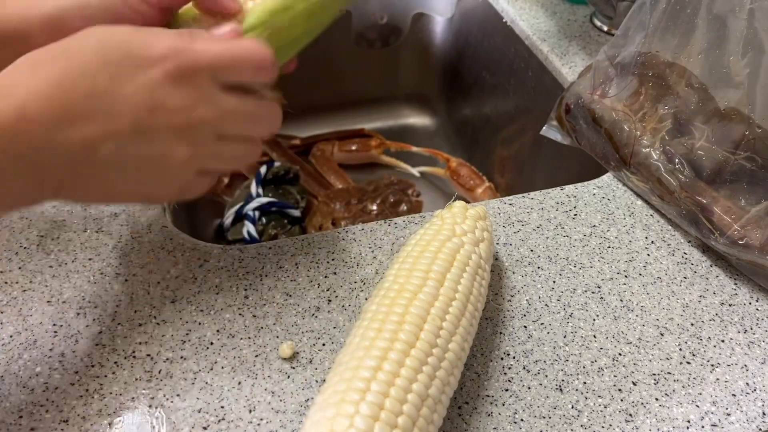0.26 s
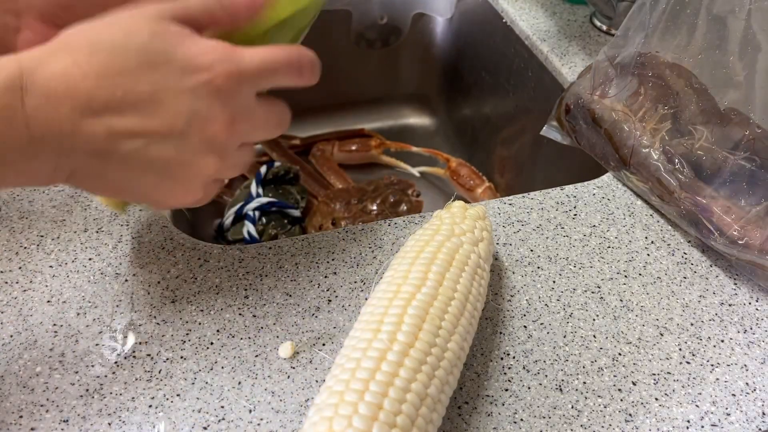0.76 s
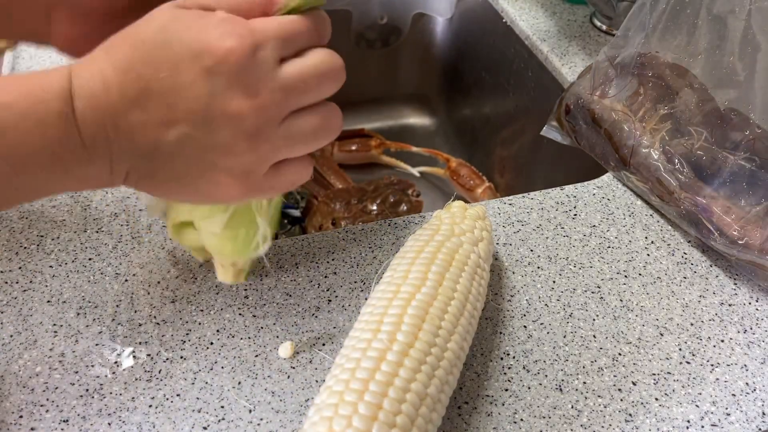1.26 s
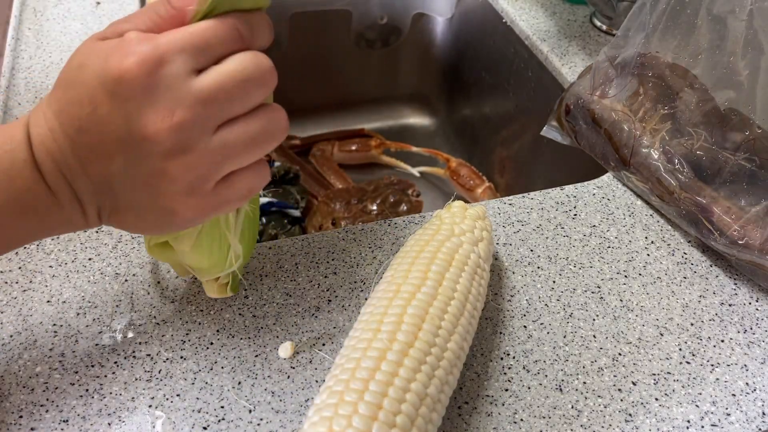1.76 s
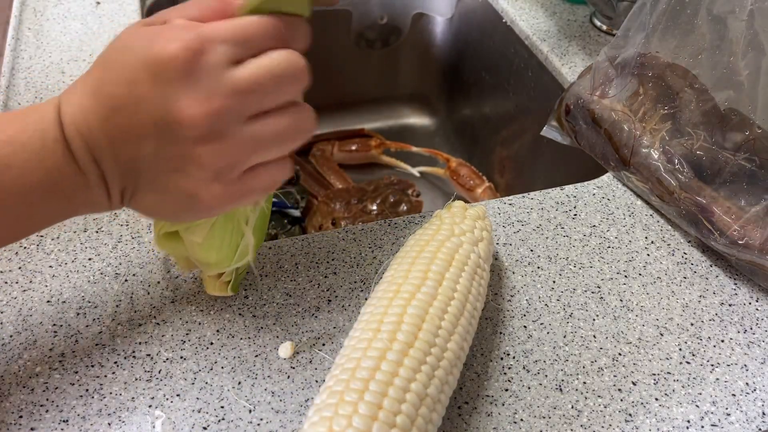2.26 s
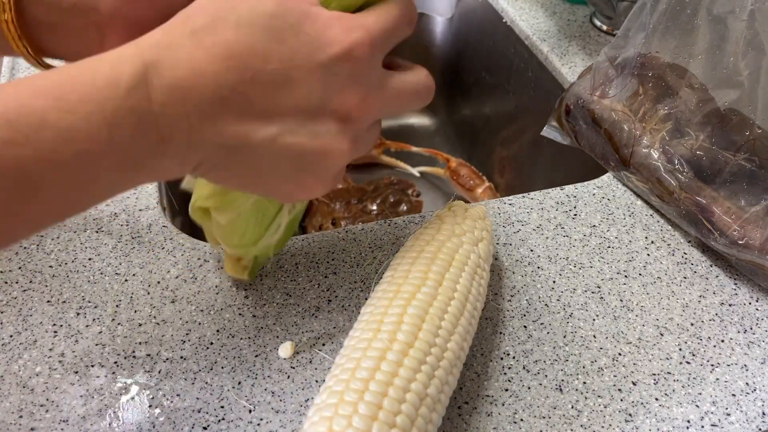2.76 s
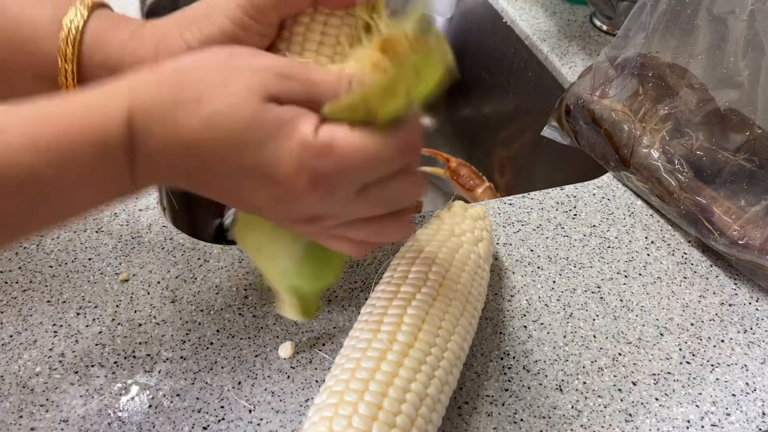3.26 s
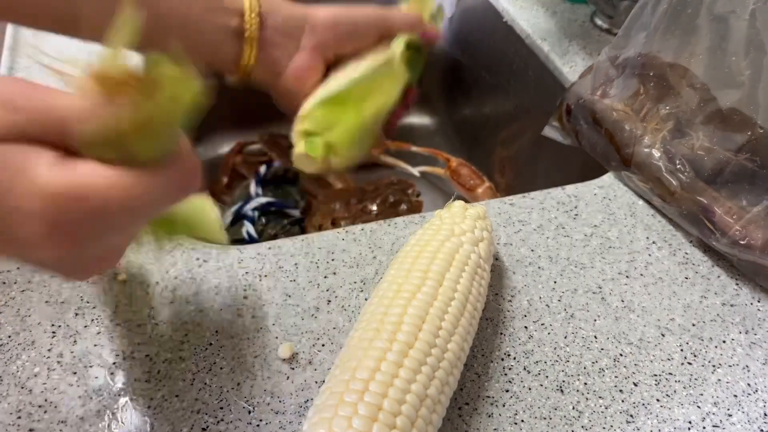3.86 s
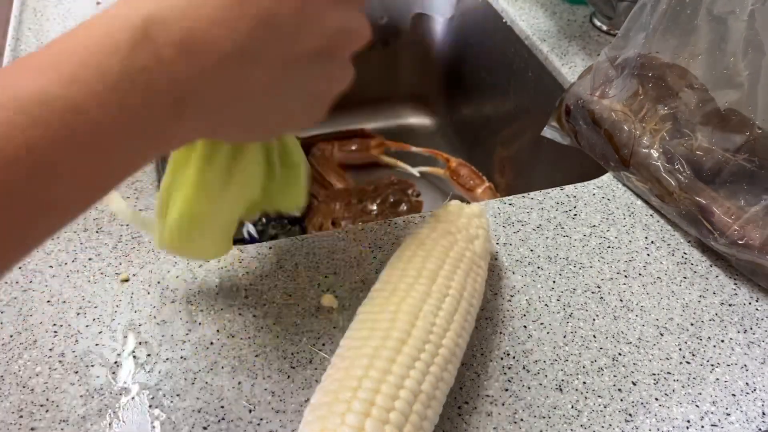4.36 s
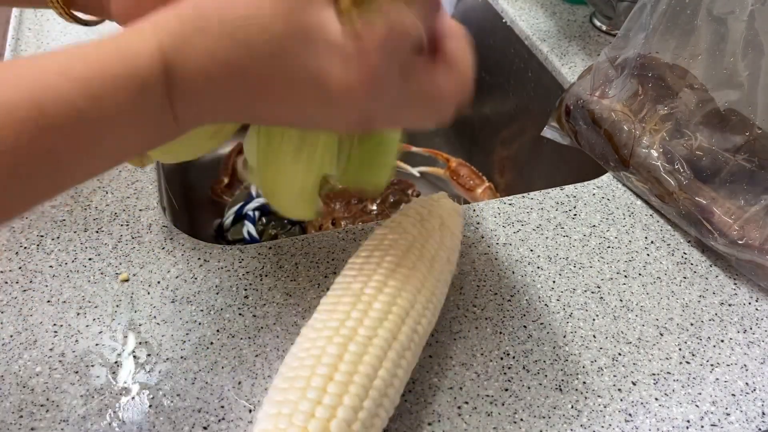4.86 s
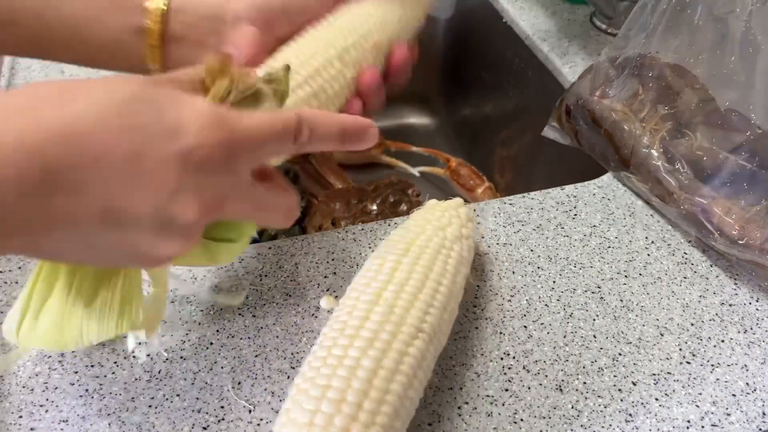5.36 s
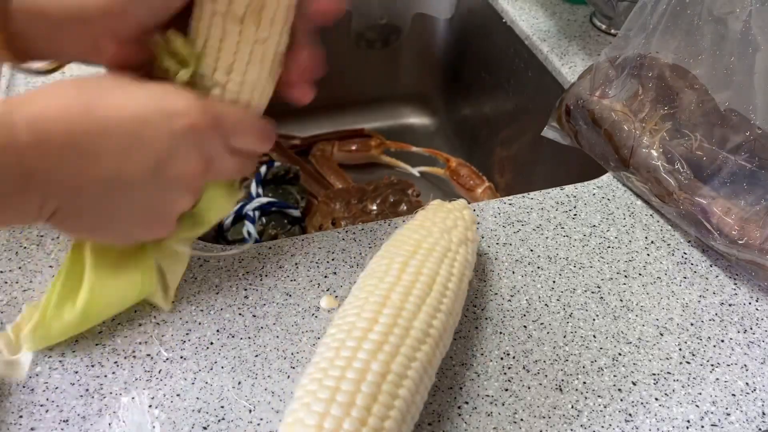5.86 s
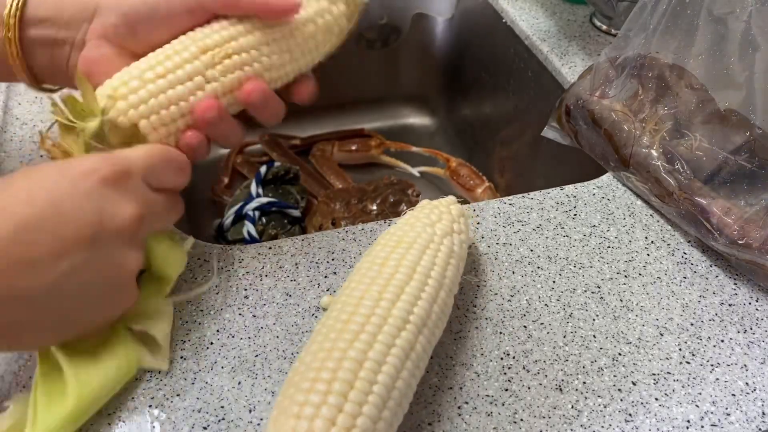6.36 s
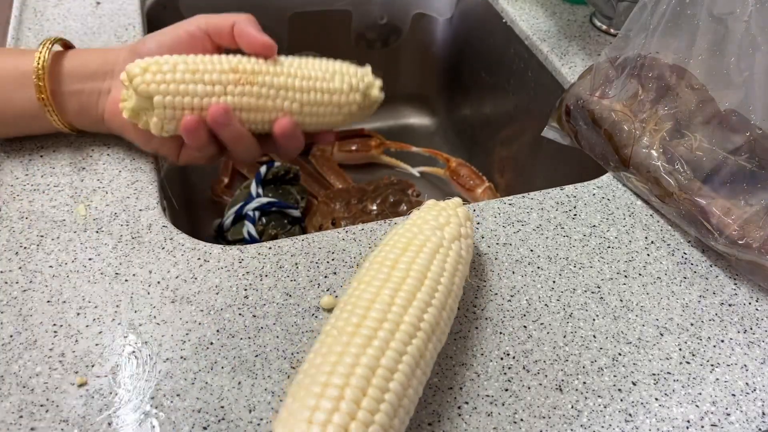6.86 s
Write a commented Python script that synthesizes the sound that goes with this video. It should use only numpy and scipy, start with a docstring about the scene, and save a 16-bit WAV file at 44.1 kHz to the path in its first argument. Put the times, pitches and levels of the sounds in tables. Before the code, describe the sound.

Corn husks rustle, snap and rip in dry crackling bursts close up in a kitchen, over a rushing extractor fan and low wavering hum.

```python
"""Husking corn over a sink

Hands strip the husks from an ear of corn over a kitchen sink, close to a phone, heard in wide stereo.
Leaf fibres break as random impulses in dense crackle; single snaps click and ring, and dull thumps fall between.
Behind, an extractor fan rushes as shaped noise and whines, mains hum wavers as a sine,
and a washing machine motor groans in sagging strokes somewhere in the flat."""
import sys
import numpy as np
from scipy import signal
from scipy.fft import rfft, irfft
from scipy.io import wavfile
from scipy.ndimage import uniform_filter1d

SR = 44100
rng = np.random.default_rng(int(sys.argv[2]) if len(sys.argv) > 2 else 0)


def store_wav(level_fs):
    """Save 16-bit WAV to argv[1]."""
    pcm = np.round(np.clip(np.atleast_2d(level_fs), -1, 1) * 32767)
    wavfile.write(sys.argv[1], SR, pcm.T.astype(np.int16))


N = 313814
T = np.arange(N) / SR  # seconds
F = np.arange(N // 2 + 1) * SR / N  # Hz
U = np.arange(int(0.1 * SR)) / SR  # seconds since a single event


def undb(db):
    """Turns dB into an amplitude factor."""
    return 10 ** (np.asarray(db) / 20)


def level(x, db):
    """Sets the rms of a sound in dB."""
    return x * undb(db) / np.sqrt(np.mean(x ** 2))


def colour(x, table):
    """Weights the spectrum by (Hz, dB) points, joined on a log frequency axis."""
    hz, db = np.transpose(table)
    gain_db = np.interp(np.log(F + 1), np.log(hz), db)
    return irfft(rfft(x) * undb(gain_db), N)


def ring(x, hz, width_hz):
    """One resonance, gain 1 at the centre."""
    b, a = signal.iirpeak(hz, hz / width_hz, SR)
    return signal.lfilter(b, a, x)


def walk(rate):
    """Random levels held 1 / rate seconds and smoothed twice; spread near 1."""
    k = int(SR / rate)
    steps = np.repeat(rng.standard_normal(N // k + 1), k)
    return 1.32 * uniform_filter1d(uniform_filter1d(steps, k), k)[:N]


def tone(hz):
    """Sine of rms 1 on a moving frequency."""
    return np.sqrt(2) * np.sin(2 * np.pi * np.cumsum(hz + 0 * T) / SR)


def plateau(start, hold, rise_db_per_s, fall_db_per_s):
    """Gain that climbs to 1 by the start, holds and falls away."""
    rise_db = rise_db_per_s * (T - start)
    fall_db = fall_db_per_s * (start + hold - T)
    return undb(np.minimum(0, np.minimum(rise_db, fall_db)))


def blip(hz, rise_s, cycles, turn):
    """A few cycles that swell and die, 60 dB down after the given cycles; peak 1."""
    envelope = np.minimum(U / rise_s, 1) * undb(-60 * U * hz / cycles)
    x = envelope * np.sin(2 * np.pi * (hz * U + turn))
    return x / np.abs(x).max()


# Bands of the slack leaf, then the taut leaf. Each row: lower edge in Hz, upper edge in Hz.
LEAF_BANDS = [(2800, 4380), (4300, 6360)]
# Spectrum of the thin leaf edges. Each row: frequency in Hz, relative density in dB per Hz.
EDGE_SPECTRUM = [(4000, -60), (7000, 9), (10500, 7), (13500, 3.5), (15700, -13)]
# Resonances of the husk sleeve. Each row: centre in Hz, width in Hz, relative level in dB.
SLEEVE_MODES = [(994, 580, 9.5), (1430, 450, 8.5), (1800, 380, 5), (2497, 484, 6.5)]
COB_HZ, COB_WIDTH_HZ = 578, 235
TAUT_EDGE_DB, TAUT_SLOPE = -6, 0.79  # edge share with no tilt; dB of tilt per dB of edge
SLIP_DB, PART_FLICKER_DB, EDGE_FLICKER_DB = 1.1, 1.5, 1.5  # spread of the random level


def husks(slips, hands):
    """The tear sticks and slips; its breaks sound in the leaf, its thin edges, the sleeve of husks and the cob."""
    tear_db, sleeve_db, edge_db, cob_db = hands
    edge = level(colour(breaks(), EDGE_SPECTRUM), 0)
    slack, taut = (leaf_band(band) for band in LEAF_BANDS)
    # a taut leaf tears brighter: more edge, and its own sound moves up
    tilt_db = TAUT_SLOPE * (edge_db - TAUT_EDGE_DB)
    leaf = undb(-tilt_db) * slack + undb(tilt_db) * taut

    # leaf, edge and sleeve also flicker on their own
    parts = undb(-3.5 + PART_FLICKER_DB * walk(250)) * leaf
    parts += undb(edge_db - 1.0 + EDGE_FLICKER_DB * walk(110)) * edge
    parts += undb(sleeve_db - 8.0 + PART_FLICKER_DB * walk(250)) * body(SLEEVE_MODES)
    parts += undb(cob_db - 7.5) * body([(COB_HZ, COB_WIDTH_HZ, 0)])
    crackle = undb(tear_db + SLIP_DB * slips) * parts  # all parts feel the same slips

    snap_crackle = snap_bursts() * (undb(-17) * leaf + undb(edge_db - 10) * edge)
    return crackle + stem_knocks() + snap_crackle


def breaks():
    """Fibres part at random moments; most breaks are small, a few stand out."""
    breaks_per_s, scatter_db = 8000, 2.6
    hit = rng.random(N) < breaks_per_s / SR
    size = undb(scatter_db * rng.exponential(size=N))
    return level(hit * rng.standard_normal(N) * size, 0)


def leaf_band(band):
    """Breaks heard through the band in which the leaf speaks."""
    sos = signal.butter(2, band, "band", fs=SR, output="sos")
    return level(signal.sosfilt(sos, breaks()), -6.0)


def body(modes):
    """Breaks heard through resonances, each applied twice for steep flanks."""
    inner = breaks()
    rings = (undb(db) * ring(ring(inner, hz, width), hz, width) for hz, width, db in modes)
    return level(sum(rings), 0)


# Fingers working the leaves under the rips. Each row: time in seconds, rustle level in dB before part trims.
HANDLING = [(0.0, -46.5), (0.5, -47.5), (1.27, -52.5), (1.49, -47.5), (1.94, -49), (2.2, -53.5),
            (2.42, -49.5), (2.7, -51), (3.0, -44), (3.4, -48), (3.9, -51), (4.4, -48), (4.68, -46),
            (5.0, -42.5), (5.35, -49), (5.5, -44), (5.7, -52), (5.95, -43.5), (6.3, -48.5), (6.85, -52.5),
            (7.12, -42)]
# Shares of the handling, relative to the rustle: husk sleeve, thin leaf edges, cob, each in dB before trims.
HANDLING_PARTS_DB = [4.5, -7.5, 0.5]
# Rips, one per tug. Each row: start of full strength in seconds, hold in seconds, crackle level in dB,
# then husk sleeve, thin leaf edges and cob in dB relative to the crackle, all before part trims.
RIPS = [(0.399, 0.024, -37, 8.5, -6, -5), (0.42, 0.025, -37, 1, -3.5, -9), (0.447, 0.016, -41, -3, -6, -9),
        (2.12, 0.01, -44, 5, -14, -7), (2.822, 0.013, -42, 8, -9, -8), (2.852, 0.024, -51.5, 1, 5.5, -2),
        (2.961, 0.013, -41, -2, -4, -12), (2.994, 0.012, -39, 8, -15, -8), (3.015, 0.025, -41, 1, -7, -12),
        (3.058, 0.032, -49, 11, 3, -10), (3.129, 0.014, -44.5, 20.5, -11, 2),
        (3.147, 0.017, -39, 14, -10.5, -7), (3.332, 0.0088, -39.5, 7.5, -10, -11),
        (3.516, 0.034, -36, 2.5, -6.5, -8), (3.548, 0.029, -29.5, -3, -9.5, -18),
        (3.595, 0.018, -26, 5, -9, -14), (3.632, 0.017, -24, 9, -6.5, -3),
        (3.644, 0.028, -22, 3.5, -11, -8), (3.682, 0.011, -38.5, 19, 12, -7),
        (3.704, 0.011, -19.5, 9, -7.5, -2.5), (3.724, 0.045, -23, 3.5, -5.5, -5),
        (3.772, 0.014, -39, 8, -9, 0), (4.462, 0.021, -34, 0, -5.5, -4), (4.64, 0.03, -43, 5, -14, -8),
        (4.687, 0.025, -50, 13, -14, 0), (4.73, 0.034, -45, 5, -6, -9), (4.977, 0.014, -45.5, 16, -14, -2),
        (5.046, 0.019, -40.5, 0, -6.5, -14), (5.104, 0.0077, -42, 19.5, 4.5, 8),
        (5.127, 0.05, -32.5, 5.5, -6, -19), (5.425, 0.023, -56, -6, 5, -8), (5.73, 0.0096, -41, 0, -4, -2),
        (5.94, 0.02, -36.5, 3, -8, -10), (6.012, 0.01, -44, -7, -4.5, 2), (6.056, 0.0092, -45, -3, 0, 11),
        (6.136, 0.012, -33.5, 4.5, 0, -0.5), (6.151, 0.02, -27, -5, -5.5, -12),
        (6.436, 0.023, -46, 13.5, -20, 8), (6.609, 0.012, -46, 10, -18, 20),
        (6.617, 0.024, -41, 15, -26, 9), (6.925, 0.13, -43.5, 4.5, -2, 3)]
RIP_RISE_DB_PER_S, RIP_FALL_DB_PER_S = 900, 750


def tearing():
    """Crackle level and the shares of sleeve, edges and cob in dB: rips add their power to the handling."""
    handling_db = np.interp(T, *np.transpose(HANDLING))
    shares_db = np.array([0, *HANDLING_PARTS_DB])[:, None]
    power = undb(2 * (handling_db + shares_db))
    for start, hold, db, *parts_db in RIPS:
        pull = plateau(start, hold, RIP_RISE_DB_PER_S, RIP_FALL_DB_PER_S) ** 2
        rip_power = undb(2 * (db + np.array([0, *parts_db])))
        power = power + rip_power[:, None] * pull
    db = 10 * np.log10(power)
    return db[0], *(db[1:] - db[0])


# Single fibres and leaf stems giving way, played by the next two functions.
# Each row: time in seconds, strength in dB before colouring and gains, ring level relative to it in dB,
# ring frequency in Hz.
SNAPS = [(0.303, -26, -25, 1740), (0.3905, -25, -7, 5900), (0.396, -18, -8, 1590), (0.4255, -29, -4, 5000),
         (0.437, -30, -8, 5300), (0.458, -33, -7, 5000), (0.5668, -27, -16, 1450),
         (1.7015, -23.5, -15, 1850), (1.7624, -24, -23, 1800), (1.8097, -27, -18, 1210),
         (1.8592, -32, -18, 1230), (1.9351, -36, -18, 1410), (1.982, -22, -18, 1840),
         (2.043, -30, -21, 1380), (2.121, -18, -24, 2100), (2.6255, -39, -1, 3640), (2.835, -21, -14, 1300),
         (2.9034, -27, -10, 1430), (2.95, -24, -9, 4020), (2.9645, -29, -5, 2600), (2.9958, -15, -10, 2300),
         (3.057, -16, -22, 2870), (3.0605, -16, -20, 5000), (3.1173, -22, -20, 4630), (3.144, -29, 5, 2580),
         (3.152, -23, -4, 2700), (3.153, -27, 2, 1400), (3.157, -24, 0, 3160), (3.162, -28, 0, 2900),
         (3.1673, -26, 1, 2820), (3.172, -31, 2, 2760), (3.3222, -23, -16, 3090), (3.5007, -25, -11, 2710),
         (3.5119, -33, -6, 4170), (3.559, -12.5, -11, 1550), (3.6102, -24, -11, 3400),
         (3.625, -21, 1, 2660), (3.648, -11, -8, 2670), (3.651, -22, -6, 4200), (3.66, -16, 1, 2680),
         (3.664, -24, 0, 2720), (3.669, -23, 1, 2900), (3.682, -29, 5, 2600), (3.688, -11, -13, 2370),
         (3.697, -20, 6, 1820), (3.707, -15, -5, 1880), (3.749, -13, -10, 1800), (3.948, -27, -20, 2970),
         (4.257, -44, -20, 3000), (4.4543, -17, -14, 5230), (4.4634, -23, -16, 2500),
         (4.8215, -38, -10, 4000), (4.8564, -31, -15, 3000), (4.9334, -25, -5, 2500),
         (5.0594, -24, -18, 2820), (5.103, -8.5, -11, 2290), (5.1238, -14, -1, 2300),
         (5.129, -17, 1.5, 2320), (5.1336, -21, 4, 2350), (5.1433, -13, -8, 2200),
         (5.169, -10.5, -12, 3550), (5.3921, -25, -23, 1400), (5.4245, -18.5, -26, 1600),
         (5.4445, -26, -20, 1300), (5.5995, -22, -18, 1730), (5.733, -14.5, -16, 1390),
         (5.8845, -25.5, -6, 3860), (5.9194, -22, -15, 3000), (5.939, -23, -13, 3320),
         (5.952, -28, -10, 4500), (6.011, -14, -16, 1820), (6.0647, -21, -18, 1850),
         (6.0875, -34, -6, 4700), (6.125, -7, -23, 1900), (6.1265, -12, -20, 6000), (6.133, -11, -26, 1730),
         (6.1365, -12, -16, 5000), (6.1548, -21, -2, 4700), (6.16, -17, -8, 5200), (6.1664, -12, -10, 4440),
         (6.345, -28, -22, 3000), (6.4344, -31, -11, 1880), (6.6, -22, -17, 1870), (6.617, -22.5, -3, 3580),
         (6.6275, -24, 0, 3500), (6.633, -37, 2, 2720), (6.639, -43, -1, 2700)]
SNAP_RISE_S, SNAP_T60_S = 0.001, 0.026


def snap_bursts():
    """Each snap sets off a burst of breaks that dies away: this is the burst's gain."""
    gain = np.zeros(N)
    for at, db, *_ in SNAPS:
        i = int(at * SR)
        gain[i:i + len(U)] += undb(db) * np.minimum(U / SNAP_RISE_S, 1) * undb(-60 * U / SNAP_T60_S)
    return gain


# Spectrum of a snap's click. Each row: frequency in Hz, weight in dB per Hz.
CLICK_SPECTRUM = [(500, -13), (1500, -4), (3000, -5), (5000, -5), (8500, -5), (11000, -7), (13500, -10),
                  (15700, -15)]
CLICK_T60_S, CLICK_GAIN_DB = 0.009, 13
PATCH_RISE_S, PATCH_CYCLES = 0.0011, 21  # cycles until a leaf patch is 60 dB down


def snaps():
    """The first fibres to go crack within milliseconds and ring the patch of leaf they were cut from."""
    click, patch = np.zeros(N), np.zeros(N)
    bursts = rng.standard_normal((len(SNAPS), int(CLICK_T60_S * SR)))
    turns = rng.random(len(SNAPS))
    for (at, db, ring_db, hz), turn, burst in zip(SNAPS, turns, bursts):
        i = int(at * SR)
        burst = burst * undb(-60 * np.arange(len(burst)) / len(burst))
        click[i:i + len(burst)] += undb(db) * burst / np.sqrt(np.sum(burst ** 2))
        ringing = blip(hz, PATCH_RISE_S, PATCH_CYCLES, turn)
        patch[i:i + len(ringing)] += undb(db + ring_db) * ringing
    return undb(CLICK_GAIN_DB) * colour(click, CLICK_SPECTRUM) + patch


# Thick leaf stems breaking off the cob. Each row: time in seconds, strength in dB before colouring and gain.
KNOCKS = [(2.996, -31), (3.697, -20), (3.706, -23)]
# Spectrum of a breaking stem. Each row: frequency in Hz, weight in dB per Hz.
KNOCK_SPECTRUM = [(400, -24), (800, -3), (1200, 21.5), (2500, -25), (4000, -24), (8000, -20.5)]
KNOCK_T60_S, KNOCK_GAIN_DB = 0.028, 6.5


def stem_knocks():
    """A thick stem breaks as a dying burst of fibre breaks, strongest near 1200 Hz."""
    fibres, stems = breaks(), np.zeros(N)
    for at, db in KNOCKS:
        i = int(at * SR)
        stems[i:i + len(U)] += undb(db - 60 * U / KNOCK_T60_S) * fibres[i:i + len(U)]
    return undb(KNOCK_GAIN_DB) * colour(stems, KNOCK_SPECTRUM)


# Short dull thumps: mostly the cob jolting, the two lowest (182 and 225 Hz) the washing machine motor starting.
# Each row: time in seconds, peak in dB ahead of the room, frequency in Hz, cycles until it is 60 dB down.
THUMPS = [(2.995, -19, 1800, 7), (2.996, -30, 814, 14), (3.627, -21, 540, 42), (3.706, -17.5, 516, 25),
          (3.716, -15, 530, 20), (3.636, -21, 600, 14), (3.643, -22, 1000, 14), (3.742, -34, 517, 26),
          (6.045, -23.5, 182, 18), (6.602, -24.5, 1130, 24), (6.609, -30, 620, 14), (6.612, -26, 1020, 7),
          (6.619, -27, 680, 9), (6.623, -27, 1290, 14), (6.628, -25, 553, 11), (6.637, -25.5, 225, 14),
          (6.645, -25, 616, 20)]
THUMP_RISE_S = 0.0032


def dull_thumps():
    """Each thump is a sine that swells within milliseconds and dies after a few cycles."""
    out = np.zeros(N)
    for (at, db, hz, cycles), turn in zip(THUMPS, rng.random(len(THUMPS))):
        i = int(at * SR)
        thump = undb(db) * blip(hz, THUMP_RISE_S, cycles, turn)
        out[i:i + len(thump)] += thump
    return out


# Air rushing through the fan. Each row: frequency in Hz, relative density in dB per Hz.
FAN_SPECTRUM = [(24, -38), (30, -6), (36, -5), (50, -5), (70, 2), (125, -7), (170, -8), (212, -15.5),
                (260, -13.5), (320, -17.5), (400, -17), (600, -28), (900, -24), (1500, -31.5), (2200, -30),
                (4000, -36.5), (6500, -42), (10000, -54), (14000, -57), (15600, -75)]
# Duct resonances. Each row: centre in Hz, width in Hz, rms level in dB ahead of the stereo stage.
DUCT = [(240, 4.6, -51.5), (360.8, 16, -52.5), (562.3, 13, -51.5), (735, 30, -48.5), (1186, 54, -47.5),
        (1403, 38, -51), (1826, 16, -58), (2760, 38, -68)]
FAN_DB, FAN_FLICKER_DB = -31, 0.51  # rms before the flicker; spread of the flicker


def fan():
    """Rushing air as shaped noise that flickers a little, with duct resonances rung by noise of their own."""
    air = level(colour(rng.standard_normal(N), FAN_SPECTRUM), FAN_DB)
    air = air * undb(FAN_FLICKER_DB * walk(2.51))
    return air + sum(level(ring(rng.standard_normal(N), hz, width), db) for hz, width, db in DUCT)


def fan_whine():
    """Blade tone and its octave on one slightly wandering spin, each wavering in level."""
    blade_hz = 373 * (1 + 0.004 * walk(8))
    blade = undb(-47 + 2 * walk(8)) * tone(blade_hz)
    octave = undb(-64 + 2 * walk(8)) * tone(2 * blade_hz)
    return blade + octave


# The mains hum swells and sinks back. Each row: start of full swell in seconds, hold in seconds,
# rms level in dB before the waver.
HUM_SWELLS = [(0.0, 0.58, -30), (0.74, 0.2, -36), (1.277, 0.038, -32.5), (1.806, 0.25, -31.5),
              (2.105, 0.41, -37.5), (2.826, 0.79, -33.5), (3.88, 1.1, -32), (5.29, 0.4, -43),
              (5.814, 0.41, -36), (6.503, 0.11, -38), (6.9, 0.046, -34)]
HUM_HZ, HUM_FADE_DB_PER_S, HUM_WAVER_DB = 100.9, 213, 0.5


def mains_hum():
    """A low sine; where swells overlap the louder one counts."""
    swells = [undb(db) * plateau(start, hold, HUM_FADE_DB_PER_S, HUM_FADE_DB_PER_S)
              for start, hold, db in HUM_SWELLS]
    return np.max(swells, axis=0) * undb(HUM_WAVER_DB * walk(9.3)) * tone(HUM_HZ)


# Washing machine strokes, away in the flat. Each row: start of full level in seconds, hold in seconds,
# frequency at the start in Hz, rms level in dB before the waver.
STROKES = [(0.0, 0.43, 172.3, -41), (1.837, 0.86, 174.8, -34), (4.008, 0.88, 170.4, -37.5),
           (4.844, 0.098, 171.8, -35.5), (6.237, 0.305, 175.4, -35.5), (6.64, 0.3, 174.2, -35.5),
           (7.059, 0.065, 173.5, -37.5)]
STROKE_SAG_HZ_PER_S, STROKE_FADE_DB_PER_S, STROKE_WAVER_DB = 4.5, 250, 2.9


def washing_machine():
    """The motor groans in strokes, sines whose pitch sags under load."""
    out = np.zeros(N)
    for start, hold, hz, db in STROKES:
        power = plateau(start, hold, STROKE_FADE_DB_PER_S, STROKE_FADE_DB_PER_S)
        groan = tone(hz - STROKE_SAG_HZ_PER_S * (T - start))
        out += power * undb(db + STROKE_WAVER_DB * walk(18)) * groan
    return out


KITCHEN_T60_S, KITCHEN_DB = 0.12, -5  # decay time; energy of the tail relative to the direct path


def kitchen(x):
    """Hard walls and the steel sink return a short noise tail, 4 ms after the direct sound."""
    u = np.arange(int(0.3 * SR)) / SR
    tail = rng.standard_normal(len(u)) * undb(-60 * u / KITCHEN_T60_S) * (u > 0.004)
    tail = level(tail, 0) / np.sqrt(len(u))  # energy 1
    return x + undb(KITCHEN_DB) * signal.fftconvolve(x, tail)[:N]


# The two stereo channels. Each row: frequency in Hz, lead of the right channel in radians,
# left minus right in dB, likeness from 0 to 1.
CHANNELS = [(60, 0, -.5, .995), (110, .1, -.8, .99), (150, .2, -2.5, .75), (280, -1.3, 5, .5),
            (450, .1, 2.5, .7), (650, -1.5, -2, .3), (950, -2.8, 4, .5), (1350, -4.5, 0, .3),
            (1800, -6.6, 2, .85), (2700, -7.5, 1.5, .75), (3600, -7.2, 5, .4), (4700, -6.5, 5.5, .55),
            (6500, -5.1, 2.5, .6), (7700, -3.3, 0, .97), (9000, -3, 0, .97), (10000, -1.5, 0, .8),
            (11200, -.3, 0, .95), (13000, .4, 0, .95), (13900, 2, 0, .7), (15000, 3.1, 0, .97)]


def widen(pair):
    """Sets the channels apart in phase and level by frequency, half the difference put on each."""
    hz, lead, balance_db = np.array(CHANNELS)[:, :3].T
    gain = undb(np.interp(F, hz, balance_db) / 2)
    half = gain * np.exp(-0.5j * np.interp(F, hz, lead))
    return irfft(pair * np.array([half, 1 / half]), N)


def scene():
    """What both channels share and what sets them apart, mixed by likeness; thumps reach both together."""
    hz, likeness = np.array(CHANNELS)[:, [0, 3]].T
    alike = np.interp(F, hz, likeness)
    slips, hands = walk(150), tearing()
    # same hands and slips, separate random breaks and air
    shared, apart = (rfft(kitchen(husks(slips, hands)) + fan()) for _ in range(2))
    common = kitchen(snaps()) + fan_whine() + mains_hum() + washing_machine()
    shared = shared * np.sqrt((1 + alike) / 2) + rfft(common)
    apart = apart * np.sqrt((1 - alike) / 2)
    thumps = dull_thumps()
    pair = widen(np.array([shared + apart, shared - apart]))
    return pair + [kitchen(thumps), kitchen(thumps)]  # each channel gets its own room tail


def record(dry):
    """A steep low-pass cuts the top."""
    top_hz = 15500
    return signal.sosfilt(signal.ellip(8, 0.2, 70, top_hz, fs=SR, output="sos"), dry)


dry = scene()
out = record(dry)
store_wav(out)
```